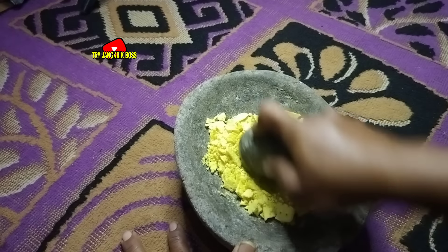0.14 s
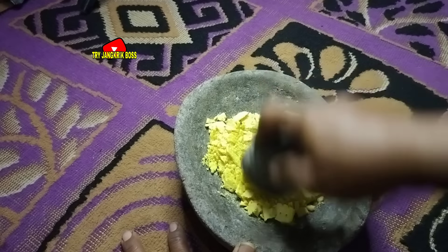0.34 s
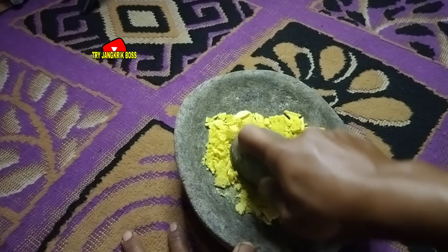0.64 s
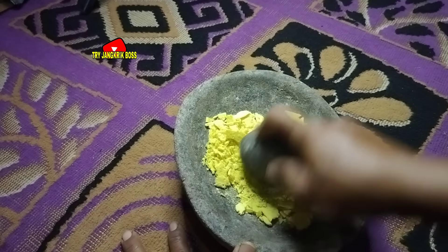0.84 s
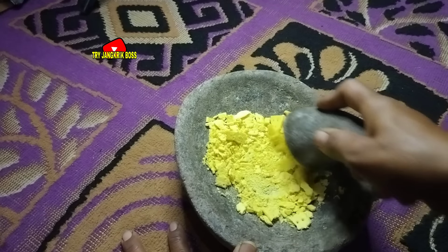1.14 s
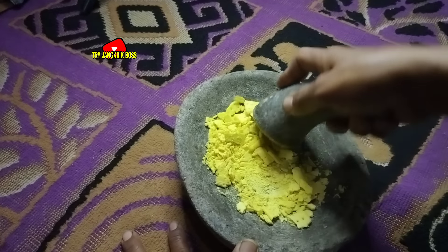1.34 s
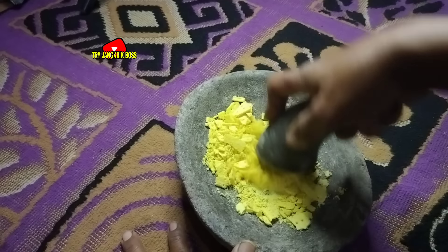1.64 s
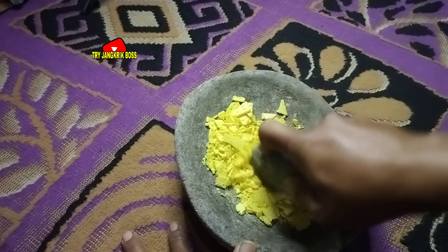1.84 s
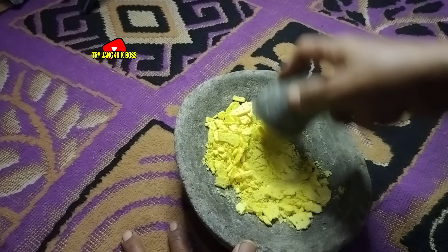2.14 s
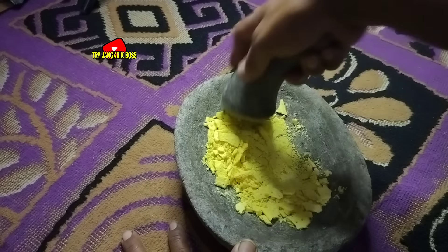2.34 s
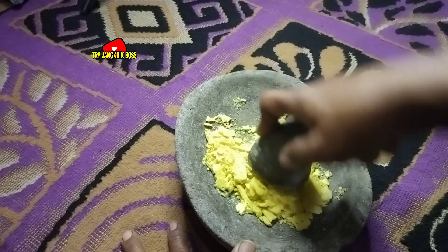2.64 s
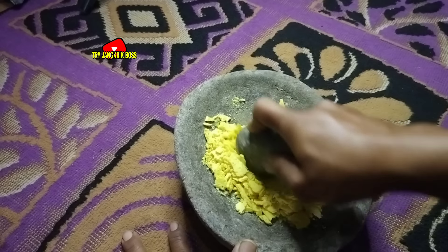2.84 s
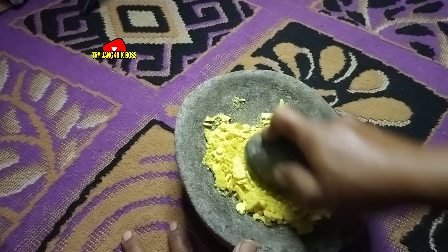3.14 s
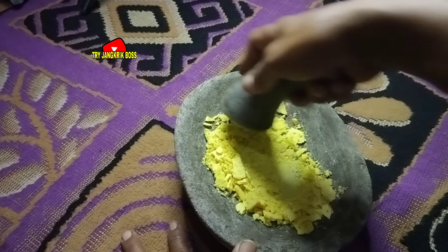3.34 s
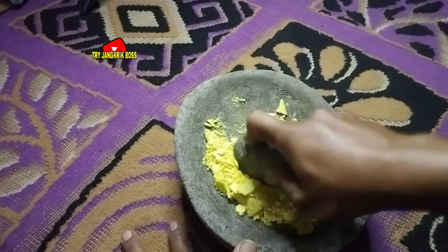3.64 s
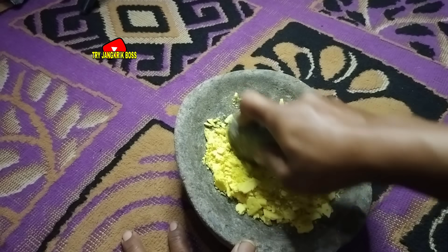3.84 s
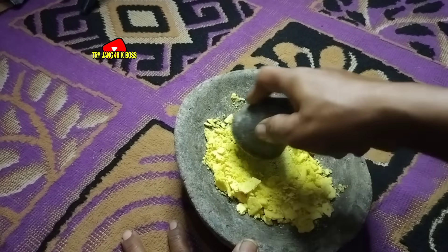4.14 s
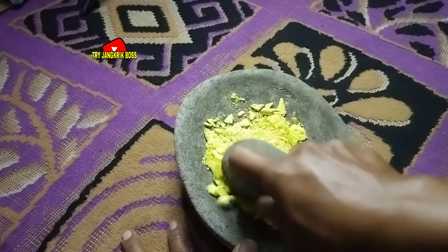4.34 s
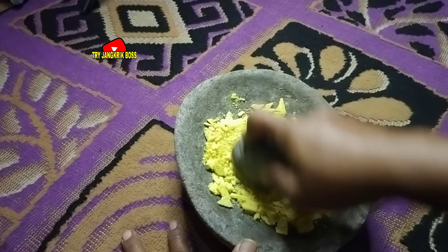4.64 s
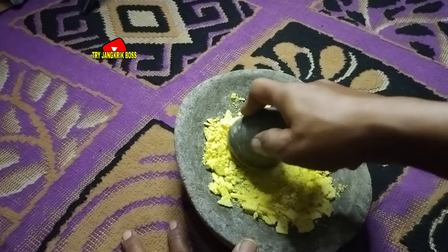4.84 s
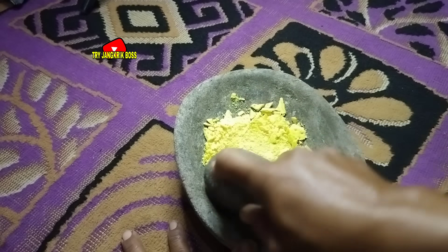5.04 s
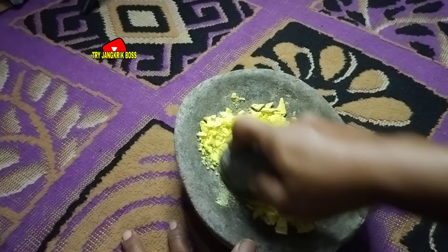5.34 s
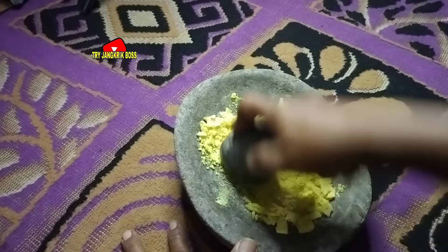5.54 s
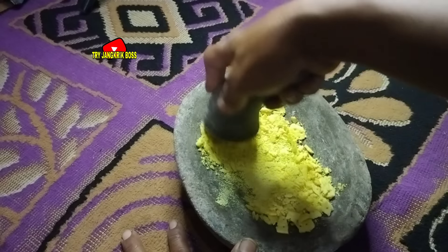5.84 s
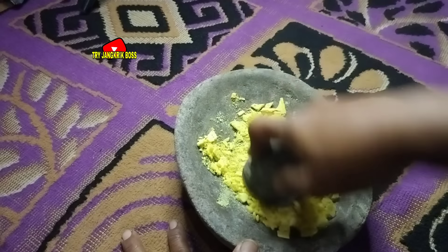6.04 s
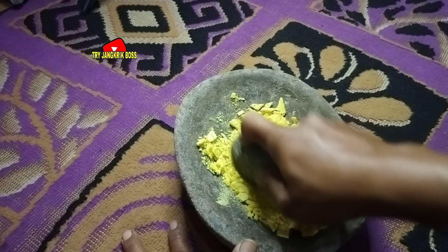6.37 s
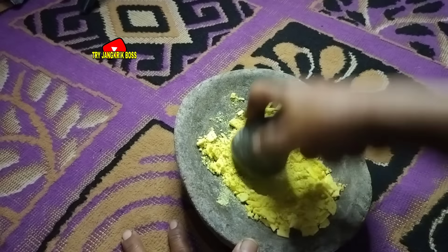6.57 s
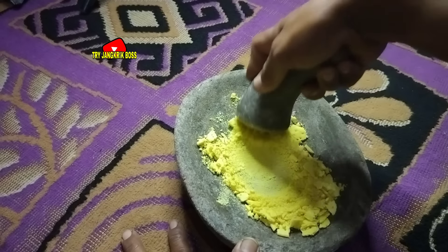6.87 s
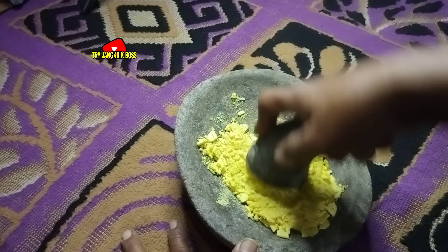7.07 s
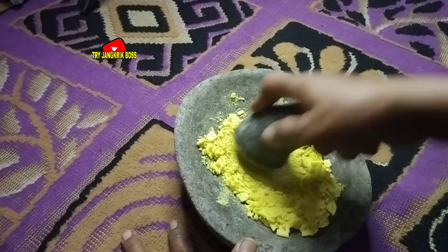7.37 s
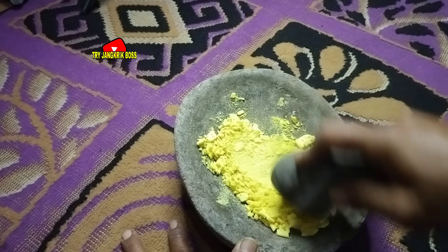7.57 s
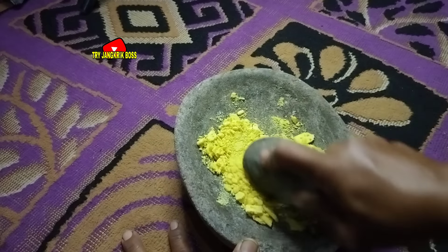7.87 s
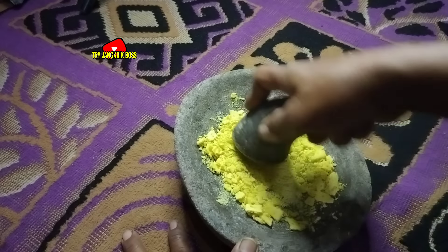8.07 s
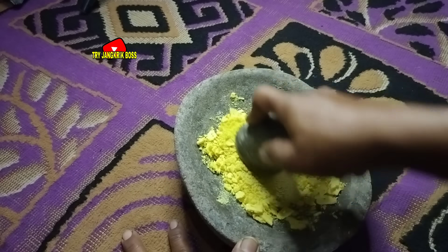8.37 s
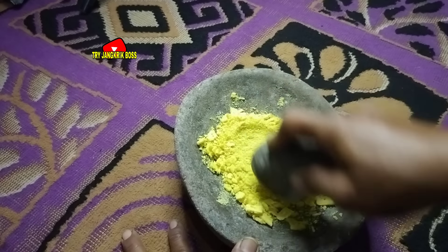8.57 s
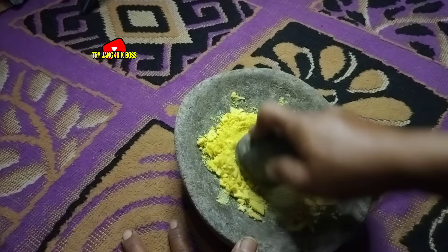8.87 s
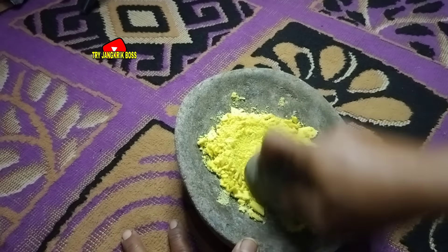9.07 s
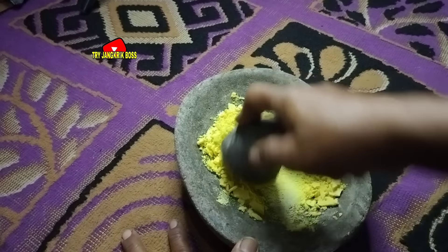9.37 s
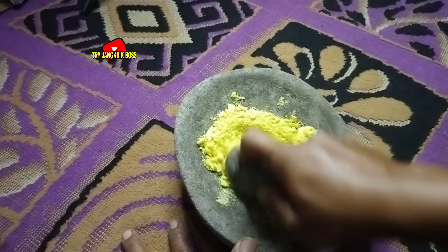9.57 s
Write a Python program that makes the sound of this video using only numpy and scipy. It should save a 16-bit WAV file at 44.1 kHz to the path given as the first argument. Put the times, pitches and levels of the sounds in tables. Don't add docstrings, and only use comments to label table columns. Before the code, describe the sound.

A stone pestle grinds dry, brittle crumbs in a stone mortar with quick gritty crunches, ringing scrapes and three hard clacking knocks, over faint traffic rumble.

```python
import sys
import numpy as np
from scipy import signal
from scipy.io import wavfile
from scipy.ndimage import uniform_filter1d

SR = 44100
rng = np.random.default_rng(int(sys.argv[2]) if len(sys.argv) > 2 else 0)


def to_wav(sig):
    pcm = np.clip(np.atleast_2d(sig), -1, 1) * 32767
    pcm = np.round(pcm).astype(np.int16)
    wavfile.write(sys.argv[1], SR, pcm.T)


def undo_db(level):
    steps = np.asarray(level, float) / 20
    return 10 ** steps


N = 428211

# f/Hz, level/dB per Hz
ROAD_SPECTRUM = [(12, -37), (20, 2.5), (54, -8), (97, 5), (280, -13), (357, -15), (544, -29), (947, -26),
                 (1080, -32.5), (1880, -40), (2060, -19), (2460, -62), (4000, -89.5), (5200, -68),
                 (8800, -120)]
# f/Hz, likeness/0..1
ROAD_LIKENESS = [(60, 0.93), (130, 0.97), (290, 0.86), (640, 0), (1400, 0)]
# t/s, level/dB
ROAD_LEVEL = [(0, -42), (1.2, -42.5), (1.7, -38), (2.4, -43), (3.6, -38.5), (4.4, -38.5), (5.4, -39.5),
              (6.9, -37.5), (9.7, -34.5)]
# t middle/s, length/s, level/dB
ENGINE_SWELLS = [
    (.9, .5, -41),
    (1.8, 0.82, -30.5),
    (2.42, 0.54, -26.5),
    (3.3, 0.72, -33.5),
    (4.6, 0.61, -34.5),
    (6.2, 0.51, -50),
    (6.9, 0.41, -33.5),
    (7.5, 0.35, -51),
    (8.4, 1, -48),
    (9.1, 0.45, -42.5),
]
# f/Hz, width/Hz, level/dB
INSECT_BANDS = [
    (2275, 210, -87),
    (4850, 510, -65),
    (6930, 640, -54),
    (7550, 500, -67),
    (10300, 1000, -54.5),
]
# t middle/s, length/s, level/dB
NEAR_INSECT = [
    (4.25, .6, -52.5),
    (7.55, 0.77, -51.5),
    (8.65, 0.61, -55),
]

# t middle/s, length/s, grit level/dB, bare stone level/dB
EARLY_STROKES = [(.068, 0.079, -36, -6.5), (.21, 0.19, -44, 2.5), (.575, 0.18, -31, -6.5),
                 (.76, 0.075, -38.5, -3), (.89, 0.34, -49.5, -3), (1.27, 0.22, -32, -4),
                 (1.485, 0.17, -37.5, -10.5), (1.695, 0.2, -27, -9.5), (1.81, 0.3, -33, -20),
                 (1.92, .14, -30.5, -2), (2.105, 0.1, -41.5, -8.5), (2.49, 0.076, -30, -9.5),
                 (2.64, 0.23, -28.5, -10), (2.865, 0.17, -32, -6), (3.075, .11, -33, -6.5),
                 (3.21, .16, -44, 4.5), (3.535, 0.077, -52, 51), (3.63, 0.16, -31.5, -4.5),
                 (3.78, 0.11, -30.5, -2), (3.95, 0.15, -39.5, -2), (4.09, 0.15, -46, 5.5),
                 (4.405, 0.089, -31.5, -3), (4.49, 0.17, -33.5, -4), (4.69, .1, -34.5, -8),
                 (4.815, 0.12, -36.5, -1)]
# t middle/s, length/s, grit level/dB, bare stone level/dB
LATE_STROKES = [(5.236, 0.15, -33.5, -3.5), (5.424, 0.09, -30.5, -7), (5.561, 0.21, -41.5, -0.5),
                (5.979, 0.09, -35, -4), (6.082, 0.17, -29, -8.5), (6.258, 0.17, -30, -4),
                (6.483, 0.088, -39.5, -0.5), (6.605, .15, -45, 3), (6.918, 0.069, -32, 12.5),
                (7.027, 0.1, -31.5, -3.5), (7.117, 0.15, -32.5, -7), (7.281, 0.13, -27.5, -4.5),
                (7.425, 0.14, -50.5, 1), (7.882, 0.2, -28, -6.5), (8.03, 0.16, -28, -5.5),
                (8.252, 0.1, -26, -7), (8.403, .15, -31, -2), (8.848, 0.12, -30.5, -2),
                (8.923, 0.17, -30.5, -2.5), (9.132, 0.099, -29.5, -5), (9.299, 0.14, -31, -2),
                (9.685, 0.25, -35, 1.5)]
# t/s, grit level/dB
CRUNCHES = [
    (.452, -28),
    (1.121, -55),
    (2.407, -33),
    (4.363, -31),
    (5.113, -35.5),
    (5.883, -32),
    (7.681, -33),
    (9.571, -38),
]
# f/Hz, level/dB per Hz
GRIT_SPECTRUM = [(240, -52), (400, -18.5), (932, -21), (1230, -9), (1860, -11.5), (2170, -7), (2380, -2.5),
                 (3240, -13), (3900, -3), (5470, -7), (6990, -8.5), (14400, -9), (15800, -26)]
# f/Hz, likeness/0..1
GRIT_LIKENESS = [(400, .8), (1400, .75), (3100, .35), (6800, .1), (15000, 0)]
# f/Hz, level left re right/dB
GRIT_BALANCE = [(400, -1.2), (2400, -1), (4400, .5), (8000, 1.5), (15000, .5)]
# t middle/s, length/s, level re grit/dB
DUST_SWELLS = [
    (.45, 0.39, -1),
    (1.6, 1.4, -6),
    (2.6, 0.93, -9.5),
    (3.9, 1.32, -6.5),
    (5.2, 0.58, -1),
    (7.05, 0.36, -9.5),
    (7.8, 0.33, -0.5),
    (8.9, 1.3, -6.5),
    (9.6, 0.79, -8),
]
# t middle/s, length/s, level re grit/dB
SQUEAL_SWELLS = [(.55, .3, -9), (1.3, .3, -9), (1.7, .4, -9), (2.6, .5, -9), (3.7, .5, -10), (4.5, .5, -9),
                 (5.3, .5, -8), (6.15, .5, -7), (7.15, .5, -8), (7.87, .2, -4), (8.03, .15, -5),
                 (8.33, .3, -4), (8.9, .3, -7), (9.2, .3, -7)]
# t middle/s, length/s, level re grit/dB
OVERTONE_SWELLS = [(.2, 0.35, -11), (.85, 0.24, -9), (3.22, 0.19, -8), (3.95, 1, -11.5), (4.81, 0.09, -4),
                   (6.3, 0.28, -9.5), (6.58, 0.33, -3), (7.3, 0.63, -9.5), (8.43, 0.15, -9.5),
                   (8.96, 0.11, -4.5), (9.35, 0.18, -6)]
# t middle/s, length/s, level/dB, lower-mode lean/dB
EARLY_SONG = [(0.064, 0.075, -46, -4), (0.11, 0.054, -46, -3), (0.186, 0.065, -43, -3),
              (0.227, 0.057, -35, -2), (0.471, 0.042, -40, -6), (0.579, 0.061, -37, 1),
              (0.625, 0.083, -40, -5), (0.666, 0.054, -41, -3), (0.782, 0.082, -45, 5),
              (0.86, 0.084, -46, -1), (0.93, 0.082, -51, -5), (1.343, 0.095, -33, 5),
              (1.471, 0.041, -48, -3), (1.638, 0.051, -50, -3), (1.69, 0.058, -27, -4),
              (1.74, 0.058, -47, -5), (1.838, 0.058, -49, -3), (1.958, 0.11, -37.5, -4),
              (2.081, 0.051, -49, -5), (2.419, 0.031, -34, -3.5), (2.476, 0.061, -37, -6),
              (2.66, 0.061, -41, -18), (2.826, 0.071, -38, -7), (2.863, 0.054, -34, -13),
              (2.931, 0.048, -49, -1), (2.965, 0.054, -52, -2), (3.047, 0.051, -34, -3),
              (3.101, 0.048, -37, -3), (3.199, 0.18, -39.5, -5), (3.666, 0.085, -41, -6),
              (3.712, 0.075, -41, -6), (3.779, 0.13, -34, -1), (3.937, 0.087, -38, -2),
              (4.055, 0.13, -38.5, -8), (4.143, 0.076, -43.5, -6), (4.378, 0.078, -45, 3),
              (4.516, 0.1, -38, -4), (4.681, 0.058, -41, -4), (4.717, 0.068, -46, -1),
              (4.803, 0.092, -40, -3), (5.122, 0.037, -42, 3.5), (5.17, 0.065, -36, 6),
              (5.256, 0.1, -31, -3), (5.398, 0.054, -42, -2), (5.43, 0.068, -35, 1), (5.569, 0.14, -36, 2)]
# t middle/s, length/s, level/dB, lower-mode lean/dB
LATE_SONG = [(5.899, 0.031, -36, 7), (5.988, 0.146, -34, -2), (6.084, 0.047, -31, -7),
             (6.152, 0.071, -45, -4), (6.208, 0.054, -36, -3), (6.24, 0.048, -41, -4),
             (6.282, 0.095, -35, -6), (6.336, 0.09, -35.5, -4), (6.49, 0.109, -38, 2),
             (6.613, 0.046, -33.5, -3), (6.667, 0.049, -45, -5), (7.04, 0.085, -32, -1),
             (7.112, 0.13, -31.5, -1), (7.27, 0.051, -38, -3), (7.313, 0.049, -29, -3),
             (7.46, 0.063, -47.5, -3), (7.796, 0.059, -32, -6), (7.86, 0.1, -25.5, -3),
             (7.977, 0.092, -40, -3), (8.038, 0.088, -30, -2), (8.222, 0.075, -33, -5),
             (8.287, 0.092, -37, 2), (8.39, 0.059, -29, -4), (8.43, 0.092, -32.5, -1), (8.85, 0.15, -27, 2),
             (8.984, 0.078, -34.5, -3), (9.171, 0.066, -34, 1), (9.253, 0.078, -32.5, 0),
             (9.316, 0.082, -30, -4)]
# t middle/s, length/s, level/dB, lower-mode lean/dB
SKID_SONG = [(1.187, 0.046, -13, 6), (1.215, .05, -17, 5), (1.255, 0.065, -23, 4), (1.29, .06, -31, 2),
             (3.545, .04, -28, 0), (3.583, .05, -30, 3), (6.875, 0.026, -37, -1), (6.9, .02, -18, -10),
             (6.913, 0.016, -19, -8), (6.945, .05, -27, -5), (6.975, .05, -33, -6), (8.804, 0.055, -32, -4),
             (9.587, .02, -17, 10), (9.598, .02, -13, 14), (9.61, .02, -19, 16), (9.62, .02, -16, 18),
             (9.636, .035, -11, 24), (9.654, .025, -11, 24), (9.674, .03, -20, 16), (9.7, .025, -26, 10)]
# t middle/s, length/s, level/dB
GRATE_SWELLS = [
    (1.14, .03, -50),
    (1.17, .03, -50),
    (6.872, .035, -43),
    (6.891, .02, -33),
    (6.92, 0.051, -35),
    (6.985, .04, -42),
    (9.576, .025, -42),
    (9.608, .02, -46),
]

# f/Hz, level/dB, t60/s
BOWL_MODES = [
    (2130, 0, .15),
    (2230, 0, .115),
    (4035, -26, .085),
    (4560, -24, .07),
]
BOWL_LEADS = [-1.6, .6, .6, 1.2]
# f/Hz, level/dB, t60/s
THUD_MODES = [
    (415, -32.5, 0.046),
    (1028, 1.5, 0.02),
    (1232, 3.5, 0.019),
    (1530, 2.5, 0.018),
    (1750, -33.5, .025),
]
# t/s, crack peak/dB, thud level/dB, ring level/dB, lower-mode lean/dB
TAPS = [(.0373, -44, -58, -35, -20), (1.2274, -30, -10, -9, -4), (1.4653, -8, -25, -29, -13),
        (2.0697, -24, -65, -34, -18), (2.412, -16.5, -22, -20.5, -16), (3.4954, -42, -7, -22, 2),
        (3.9264, -45, -43, -28, -7), (5.1128, -34, -39, -46.5, 15), (5.3847, -14, -47, -41, 3),
        (5.886, -13, -26.5, -39, 18.5), (6.2297, -17, -48, -47, -7), (6.8628, -23, -33, -36, -13),
        (6.992, -27, -21.5, -46, -15), (7.678, -23.5, -34, -19, -20), (7.6885, -26, -36, -13, -11),
        (7.7872, -15, -40, -20, -14), (8.1938, -43, -43, -29, 3), (8.7504, -9.5, -35, -17.5, -12),
        (9.082, -20, -45, -35, -6), (9.5655, -50, -20, -26, 8)]
# t/s, thud level/dB, ring level/dB
JUDDER = [
    (6.8877, -12, -16),
    (6.8967, -26, -34),
    (6.9052, -8.5, -32),
    (6.9164, -8, -18),
    (6.9213, -14, -15),
    (6.9275, -8.5, -35),
    (6.935, -18, -36),
    (6.942, -26, -27),
]
# t/s, peak level/dB
SNAPS = [(0.4552, -11), (1.222, -19), (1.375, -26), (1.3828, -20), (1.4184, -11), (1.4233, -18),
         (1.459, -15), (1.502, -16), (1.5395, -18), (1.5645, -22), (1.5727, -15), (1.7719, -2),
         (1.8132, -9), (1.827, -13), (4.368, -13)]

# t middle/s, length/s, level/dB, deep re shallow/dB
PUFFS = [(.09, 0.039, -21.5, 5), (.16, 0.11, -11.5, -0.5), (.552, 0.065, -10.5, -10),
         (.645, 0.095, -16.5, 0.5), (.76, 0.083, -17, 2), (.845, 0.073, -4, 0.5), (.918, 0.14, -11.5, -1.5),
         (1.0, 0.09, -14, -0.5), (1.108, 0.036, -9, 7), (1.19, 0.13, -12, 11), (3.56, 0.095, -17.5, 8),
         (4.05, 0.037, -15, -17), (4.12, 0.15, -13.5, 3), (4.21, 0.081, -28.5, 4), (4.405, 0.076, -13, -2),
         (4.49, 0.09, -14.5, -12), (8.79, 0.11, -18.5, 3.5), (8.955, 0.048, -16.5, 24)]

# t/s, thud level/dB, ring level/dB, lower-mode lean/dB, t60/s
BLOWS = [
    (1.1221, -11, -2, -6, 0.18),
    (3.4884, -1.5, -10.5, 6, 0.11),
    (9.5684, -13, -10, 10, 0.07),
]
BLOW_LAGS = [1.7, 3.76, 1.6]
# t start/s, t end/s, level/dB
SKIDS = [
    (1.141, 1.238, -56),
    (1.238, 1.359, -74),
    (3.505, 3.588, -61),
    (9.568, 9.666, -54.5),
    (9.665, 9.707, -63),
]
# t/s, level/dB
ROCKS = [
    (2.763, -25),
    (2.7753, -29),
    (3.545, -31),
    (6.994, -27),
]

# f/Hz, level/dB
FAINT_EDGE = [(3000, -98.5), (6000, -84.5), (9000, -86.5), (11400, -88), (11550, -76), (13500, -85),
              (15300, -89), (15800, -66)]


def rms_one(x):
    return x / np.sqrt(np.mean(x ** 2) + 1e-20)


def in_time(rows):
    s, *columns = np.transpose(rows)
    return [np.interp(np.arange(N) / SR, s, c) for c in columns]


def at_hz(points, hz):
    f, value = np.transpose(points)
    return np.interp(np.log(hz), np.log(f), value)


def swells(rows, rest_db, rise=0.43, roundness=1.4):
    t = np.arange(0, N + 64, 64) / SR
    s, length, level_db, *columns = np.transpose(rows)[:, :, None]
    away = np.where(t < s, (s - t) / rise, (t - s) / (1 - rise)) / np.maximum(length, .02)
    power = undo_db(2 * np.maximum(level_db - 12 * away ** roundness, -200))
    total = power.sum(0)
    curves = [10 * np.log10(total + undo_db(2 * rest_db))]
    curves += [(power * c).sum(0) / total for c in columns]
    return [np.interp(np.arange(N) / SR, t, c) for c in curves]


def drift(rate):
    r = np.exp(-80 * np.pi * rate / SR)
    slow = signal.lfilter([1], [1, -2 * r, r * r], rng.standard_normal(N // 40 + 2002))[2000:]
    return np.interp(np.arange(N) / 40, np.arange(len(slow)), rms_one(slow))


def band(x, low_hz, high_hz):
    return signal.sosfilt(signal.butter(2, [low_hz, high_hz], "band", fs=SR, output="sos"), x)


def soft(force, cut_hz):
    return signal.sosfilt(signal.butter(2, cut_hz, fs=SR, output="sos"), force)


def ring(force, hz, t60, phase=0.):
    r, w = undo_db(-60 / (t60 * SR)), 2 * np.pi * hz / SR
    return signal.lfilter([np.sin(phase), r * np.sin(w - phase)], [1, -2 * r * np.cos(w), r * r], force + 1e-18)


def grains(per_s, spread_db):
    size = undo_db(spread_db * np.minimum(rng.exponential(1, N), 5)) * (rng.random(N) < per_s / SR)
    return rms_one(size * rng.standard_normal((2, N)))


def coloured(pair, edges, gain_db, likeness, patchy_db):
    out = 0
    for k, (low, high) in enumerate(zip(edges, edges[1:])):
        hz = np.sqrt(low * high)
        mid, side = band(pair, low, high) * (-1) ** k
        alike = np.clip(at_hz(likeness, hz), 0, 1)
        gain = undo_db(gain_db(hz)) * undo_db(patchy_db * drift(14.5))
        out = out + gain * (np.sqrt(1 + alike) * mid + np.sqrt(1 - alike) * side * [[1], [-1]])
    return out


def street():
    drone_db, road_db = swells(ENGINE_SWELLS, -58.5)[0], in_time(ROAD_LEVEL)[0]
    white = rng.standard_normal((2, N))
    road_gain = lambda hz: at_hz(ROAD_SPECTRUM, hz)
    low = coloured(white, np.geomspace(20, 320, 9), road_gain, ROAD_LIKENESS, patchy_db=2.0)
    high = coloured(white, np.geomspace(320, 4000, 7), road_gain, ROAD_LIKENESS, patchy_db=1.5)
    drone = rms_one(ring(rng.standard_normal(N), hz=72, t60=.7))
    hum = rms_one(ring(rng.standard_normal(N), hz=538, t60=0.24))
    road = undo_db(road_db) * rms_one(low) + undo_db(-55.5) * rms_one(high)
    return road + undo_db(drone_db - 6.0) * drone + undo_db(-62.5) * hum


def insects():
    out = undo_db(-58.5) * band(rng.standard_normal((2, N)), 900, 15540)
    for hz, width_hz, level_db in INSECT_BANDS:
        chorus = band(rng.standard_normal((2, N)), hz - width_hz / 2, hz + width_hz / 2)
        out += undo_db(level_db + 3 + 1.2 * drift(60) + .7 * drift(3)) * rms_one(chorus)
    near = rms_one(band(rng.standard_normal((2, N)), 4900, 5470))
    return out + undo_db(swells(NEAR_INSECT, -84.0)[0]) * near


def song(rub):
    freedom, even_s = 1.5, .014
    level_db, lean_db = swells(EARLY_SONG + LATE_SONG + SKID_SONG, rest_db=-63, rise=.45, roundness=1.6)
    lower_db = lean_db - 4.5
    out = 0
    for k, share_db in enumerate([lower_db, 0]):
        hz, _, t60 = BOWL_MODES[k]
        ports = [ring(rub[k], hz, t60 * freedom, side * BOWL_LEADS[k] / 2) for side in (1, -1)]
        mode = rms_one(np.array(ports))
        mode = mode / np.sqrt(uniform_filter1d((mode ** 2).mean(0), round(even_s * SR)) + .01)
        out = out + undo_db(share_db) * mode
    return out * undo_db(level_db) / np.sqrt(1 + undo_db(2 * lower_db))


def grinding():
    stroke_db, bare_db = swells(EARLY_STROKES + LATE_STROKES, rest_db=-69, rise=0.49, roundness=1.84)
    crunch = np.zeros(N)
    crunch[[round(s * SR) for s, db in CRUNCHES]] = undo_db(np.array(CRUNCHES)[:, 1])
    crunch = signal.lfilter([1], [1, -undo_db(-485.5 / SR)], crunch + 1e-9)
    grit_db = 10 * np.log10(undo_db(2 * stroke_db) + crunch ** 2)
    crunch_bare_db = -11
    bare_db = crunch_bare_db + (bare_db - crunch_bare_db) * undo_db(2 * (stroke_db - grit_db))
    rub_db = bare_db - 5
    dust_db = swells(DUST_SWELLS, rest_db=-8.5)[0]

    sides = np.array([[1], [-1]])
    level_db = lambda hz: at_hz(GRIT_SPECTRUM, hz) + at_hz(GRIT_BALANCE, hz) / 2 * sides
    cracks = grains(12000 * undo_db(3 * drift(40)), spread_db=-0.5)
    coarse = coloured(cracks, np.geomspace(1800, 8300, 8), level_db, GRIT_LIKENESS, patchy_db=2.2)
    dust = coloured(cracks, np.geomspace(8300, 16000, 5), level_db, GRIT_LIKENESS, patchy_db=1.2)
    rub = grains(4000 * undo_db(3 * drift(20)), spread_db=1.0)
    dull = coloured(rub, np.geomspace(350, 1800, 7), level_db, GRIT_LIKENESS, patchy_db=1.2)

    singing = song(rub) * undo_db(.8 * drift(14))
    grate = undo_db(swells(GRATE_SWELLS, -95)[0]) * rms_one(band(rub + rub[0], 3300, 4900))
    overtone_db = grit_db + swells(OVERTONE_SWELLS, rest_db=-29.5)[0] - 21.5
    overtone_hz, _, overtone_t60 = BOWL_MODES[2]
    overtone = ring(undo_db(overtone_db) * (rub + 1.45 * rub[0]), overtone_hz, overtone_t60)
    squeal = undo_db(swells(SQUEAL_SWELLS, -20)[0]) * rms_one(band(cracks + cracks[0], 5800, 7200))
    crackle = band(cracks[0] ** 3, 1500, 7500)
    crackle = undo_db(-9) * rms_one(np.array([crackle, np.roll(crackle, shift=2)]))
    grit = rms_one(coarse) + squeal + crackle - undo_db(dust_db) * rms_one(dust) + undo_db(rub_db) * rms_one(dull)
    return undo_db(grit_db + 1.2) * grit + singing + grate + overtone


def crack(clicks, t60):
    noise = rng.standard_normal((2, N))
    burst = signal.lfilter([1], [1, -undo_db(-60 / (t60 * SR))], clicks + 1e-18)
    snap = burst * (0.62 * noise[0] + 0.48 * noise) + 0.73 * clicks
    return band(snap, 2300, 8470) + undo_db(-8) * band(snap, 9900, 10000)


def thud(force, share=1):
    out = 0
    for k, (hz, level_db, t60) in enumerate(THUD_MODES):
        out = out + undo_db(level_db) * ring(force, hz, t60 * share) * (-1) ** k
    return out


def bowl(force, lean_db=0, free_t60=None, upper_lag=1.7):
    out = 0
    for k, ((hz, level_db, t60), lead) in enumerate(zip(BOWL_MODES, BOWL_LEADS)):
        push = force[k % 2] * undo_db(level_db + (lean_db if k == 0 else 0))
        t60 = free_t60 if free_t60 and k < 2 else t60
        lag = upper_lag * (k == 1)
        out = out + np.array([ring(push, hz, t60, lead / 2 - lag), ring(push, hz, t60, -lead / 2 - lag)])
    return out


def knocks():
    # t/s, crack/dB, thud/dB, ring/dB, lower-mode lean/dB
    judder = [(s, -27, thud_db, ring_db, -21) for s, thud_db, ring_db in JUDDER]
    snaps = [(s, db, db - 43, db - 55, -5) for s, db in SNAPS]
    s, crack_db, thud_db, ring_db, lean_db = np.transpose(TAPS + judder + snaps)
    at = np.round(s * SR).astype(int)
    clicks, push, strike, lean = np.zeros((2, N)), np.zeros((2, N)), np.zeros((2, N)), np.zeros(N)
    clicks[:, at] = undo_db(crack_db - 1.5)
    push[:, at] = undo_db(thud_db - 8.0)
    strike[:, at], lean[at] = undo_db(ring_db - 4.0), lean_db
    return crack(clicks, t60=.007) + thud(push) + bowl(strike, lean)


def puffs():
    level_db, deep_db = swells(PUFFS, -58, rise=0.5, roundness=1.61)
    deep = rms_one(band(rng.standard_normal(N), 35, 75))
    shallow = rms_one(band(band(rng.standard_normal(N), 70, 153.7), 30, 220))
    air = undo_db(deep_db / 2) * deep + undo_db(-deep_db / 2) * shallow
    right = undo_db(level_db - 4.5 + 3.65 * drift(25)) * air
    left = undo_db(level_db - 32.5) * rms_one(band(rng.standard_normal(N), 25, 140))
    return np.array([left, right])


def blows():
    crush_ahead_s = .005
    top_hz, _, top_t60 = BOWL_MODES[3]
    out, clicks, crush = np.zeros((2, N)), np.zeros((2, N)), np.zeros(N)
    for (s, thud_db, ring_db, lean_db, t60), lag in zip(BLOWS, BLOW_LAGS):
        at = round(s * SR)
        hit = np.zeros((2, min(SR, N - at)))
        hit[:, 0] = 1
        clicks[:, at] = undo_db(-32.5)
        crush[round((s - crush_ahead_s) * SR)] = undo_db(-29.5)
        blow = undo_db(thud_db) * thud(hit, share=.55)
        blow += undo_db(ring_db) * bowl(soft(hit, cut_hz=3230), lean_db, t60, lag)
        blow += undo_db(-40) * ring(hit, top_hz, top_t60)
        blow += undo_db(lean_db - 15) * ring(hit, hz=1640, t60=0.014)
        out[:, at:at + SR] += blow
    slips, force = grains(5000, spread_db=2.0), np.zeros(N)
    for start, end, level_db in SKIDS:
        span = slice(round(start * SR), round(end * SR))
        force[span] = undo_db(level_db) * slips[0, span]
    skid = thud(force + crush)
    return out + crack(clicks, t60=0.0033) + skid


def rocking():
    bumps = np.zeros(N)
    bumps[[round(s * SR) for s, db in ROCKS]] = -undo_db(np.array(ROCKS)[:, 1])
    return ring(bumps, hz=473, t60=0.012)


def room(x):
    t = np.arange(int(.3 * SR)) / SR
    tail = rng.standard_normal((2, len(t))) * undo_db(-60 * t / 0.054) * (t > .004)
    return signal.fftconvolve(x, band(tail, 260, 7100), axes=1)[:, :N] * undo_db(-27.0)


def scene():
    mortar = grinding() + knocks() + blows() + rocking()
    return mortar + room(mortar) + street() + insects() + puffs()


def drop_faint(x):
    hz, _, z = signal.stft(x, SR, nperseg=2048)
    centre = hz[4:1024:8, None]
    power = (np.abs(z[:, :1024]) ** 2).reshape(2, 128, 8, -1).mean(axis=2)
    block_db = 10 * np.log10(power + 1e-20)
    busy_db = np.maximum(block_db[:, 20:60].mean(axis=1, keepdims=True) + 79.0, 0)
    chance = uniform_filter1d(rng.standard_normal(block_db.shape), size=3, axis=2)
    edge_db = at_hz(FAINT_EDGE, centre) + 0.88 * busy_db * (centre > 11400) + 7.9 * chance
    z[:, :1024] *= np.repeat((block_db > edge_db) | (centre < 3000), 8, axis=1)
    return signal.istft(z, SR, nperseg=2048)[1][:, :N]


def band_limit(x):
    return signal.sosfilt(signal.butter(12, 16450, fs=SR, output="sos"), x)


def record(dry):
    limit_db, release_db_s, attack_s = -6.5, 5, 0.033
    t = np.arange(N) / SR
    peak_db = 20 * np.log10(np.abs(band(dry, 360, 9000)).max(axis=0) + 1e-6)
    held_db = np.maximum.accumulate(peak_db + release_db_s * t) - release_db_s * t
    r = np.exp(-1 / (attack_s * SR))
    duck_db = signal.lfilter([1 - r], [1, -r], np.maximum(held_db - limit_db, 0))
    ducked = dry * undo_db(-1.05 * duck_db)
    rounded = ducked / (1 + ducked ** 10) ** .1
    return band_limit(drop_faint(rounded))


dry = scene()
out = record(dry)
to_wav(out)
```